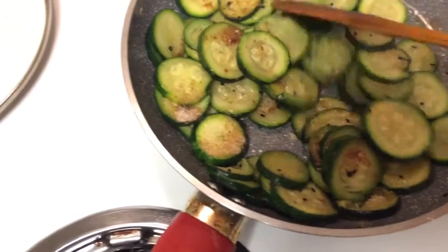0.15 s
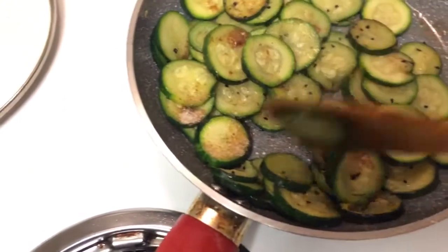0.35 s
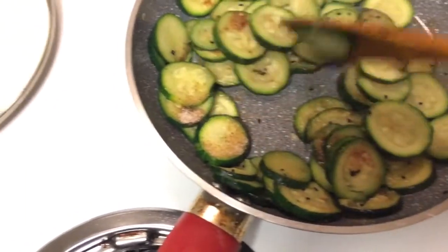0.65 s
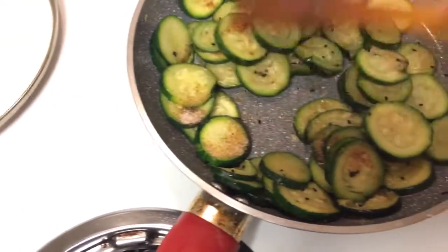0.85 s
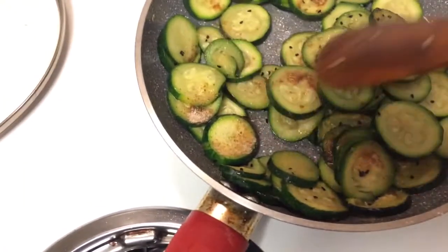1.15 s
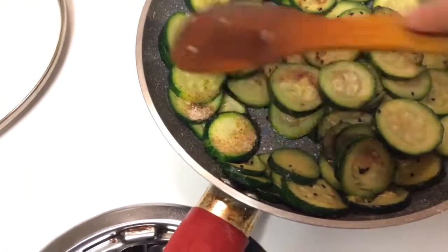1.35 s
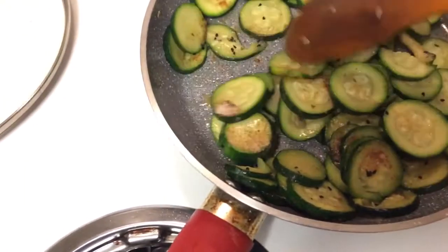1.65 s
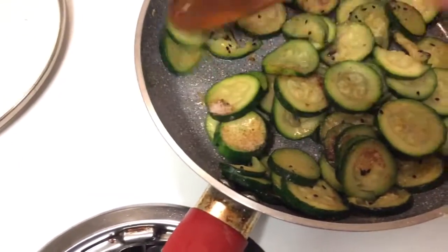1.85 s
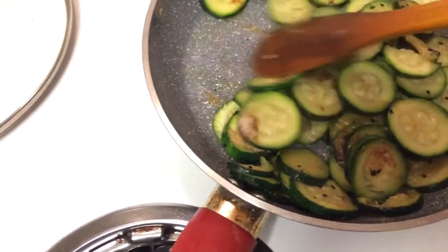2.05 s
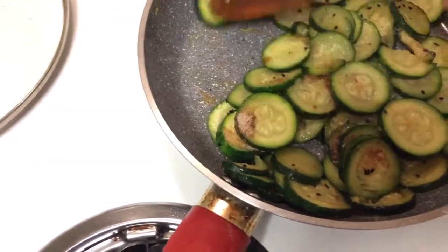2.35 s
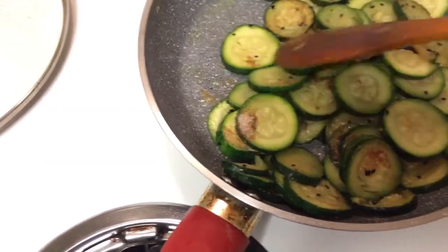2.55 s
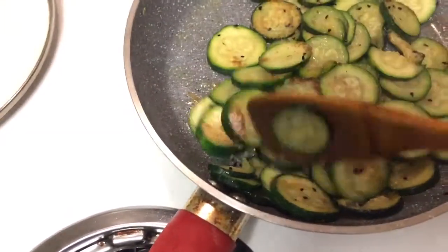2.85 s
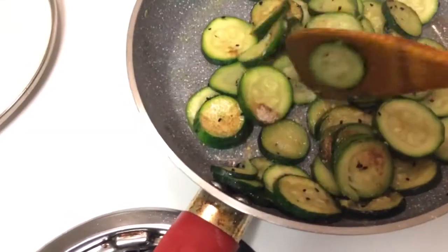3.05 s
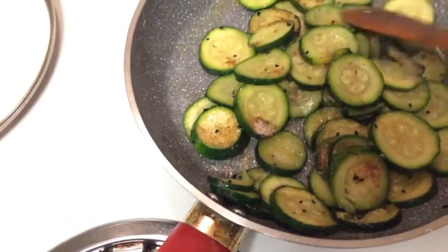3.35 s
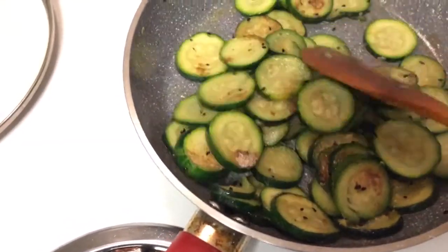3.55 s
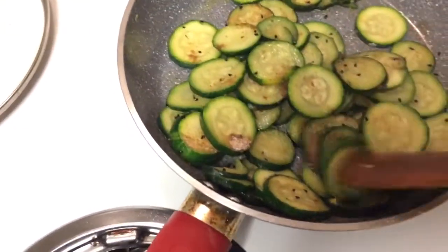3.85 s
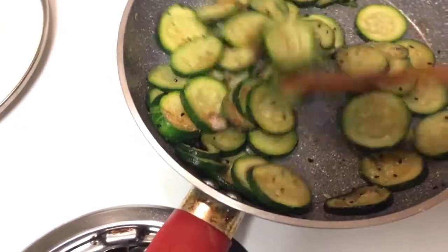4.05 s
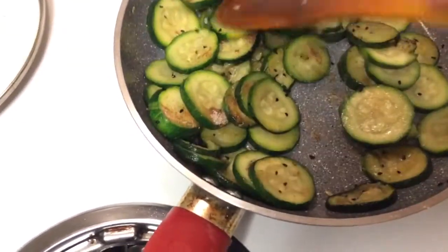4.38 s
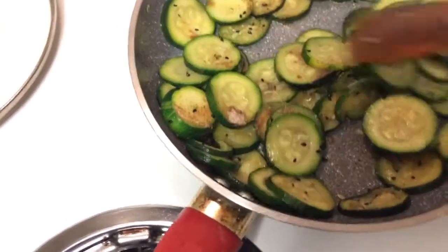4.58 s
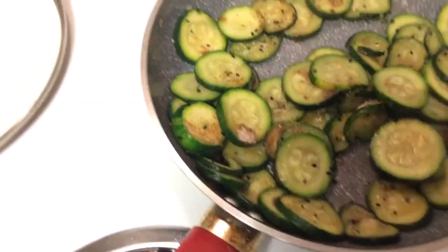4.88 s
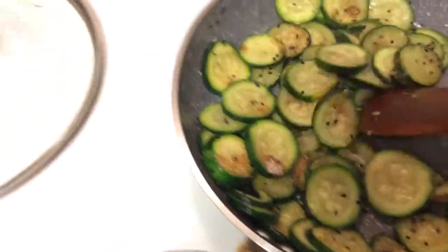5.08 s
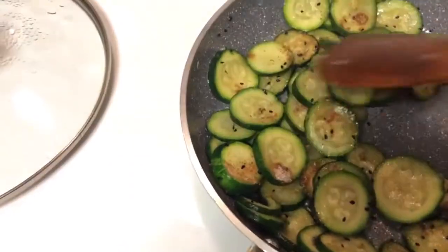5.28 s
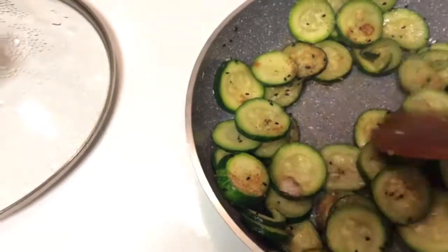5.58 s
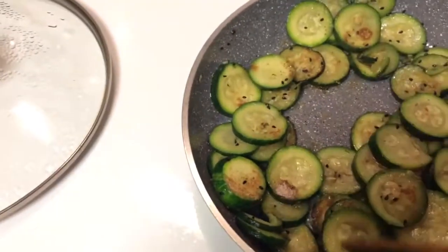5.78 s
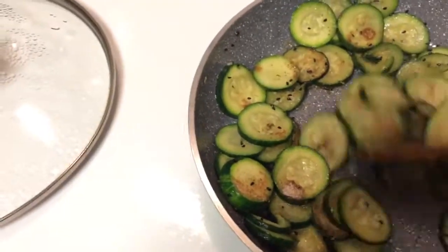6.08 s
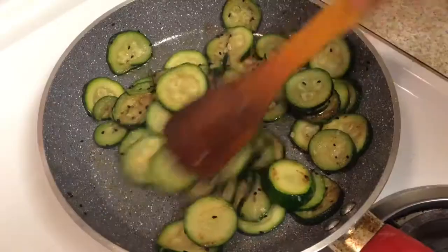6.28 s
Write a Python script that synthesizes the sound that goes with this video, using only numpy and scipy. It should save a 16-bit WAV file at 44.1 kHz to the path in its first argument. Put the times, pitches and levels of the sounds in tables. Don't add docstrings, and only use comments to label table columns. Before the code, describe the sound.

Steady wet frying hiss fills the close mono sound. Wood clatters quickly against the pan at first, then eases into sparse light taps, and later returns with harder knocks and rattling scrapes on floor, wall and rim. Low thuds come from the rocking pan, faint steam hisses and tiny pops from the food. A split-second silence precedes a last brighter sizzle and soft handle bumps in the kitchen.

```python
import sys
import numpy as np
from scipy import signal
from scipy.fft import rfft, irfft, next_fast_len
from scipy.io import wavfile
from scipy.ndimage import uniform_filter1d, map_coordinates

SR = 44100
rng = np.random.default_rng(int(sys.argv[2]) if len(sys.argv) > 2 else 0)


def boost(x):
    u = np.asarray(x, float) / 20
    return 10 ** u


def unload_wav(signal):
    wavfile.write(
        sys.argv[1],
        SR,
        np.round(np.clip(np.atleast_2d(signal).T, -1, 1) * 32767).astype(np.int16),
    )


N = 283122

# mode_hz, width_hz, level_db
BOWL_MODES = [(131, 16, -5), (273, 30, -11), (455, 17, 0), (600, 90, -17), (350, 60, -17)]
FLOOR_MODES = [(647, 55, -6), (839, 46.4, 2), (951, 57, -4), (1114, 270, -12)]
WALL_MODES = [(1288, 290, -3.5), (1474, 71, 7.5), (1666, 250, -1.5), (1900, 162, 1), (2104, 99, -1.5),
              (2334, 110, -2.5)]
EDGE_MODES = [(2695, 180, -1.5), (3364, 305, 3), (4090, 680, -2), (5170, 2000, -6.5), (7080, 3200, -7.5),
              (11800, 7800, -18.5)]


def unit(x):
    return x / np.sqrt(np.mean(x ** 2) + 1e-20)


def along(points, hz):
    f, v = np.transpose(points)
    return np.interp(np.log(hz + 1), np.log(f + 1), v)


def wobble(knots_per_s):
    knots = rng.standard_normal(int(N * knots_per_s / SR) + 4)
    return map_coordinates(knots, [np.arange(N) * knots_per_s / SR])


def filtered(x, response):
    m = next_fast_len(len(x) + 8192)
    return irfft(rfft(x, m) * response(np.fft.rfftfreq(m, 1 / SR)), m)[:len(x)]


def coloured(x, spectrum):
    return unit(filtered(x, lambda hz: boost(along(spectrum, hz))))


def swells(rows, rest_db, rise_db_s, fall_db_s):
    t = np.linspace(0, N / SR, num=3000)
    power = boost(2 * rest_db)
    for start_s, hold_s, db in rows:
        rise_db = rise_db_s * np.maximum(start_s - t, 0)
        fall_db = fall_db_s * np.maximum(t - start_s - hold_s, 0)
        power = power + boost(2 * (db - rise_db - fall_db))
    return np.interp(np.arange(N) / SR, t, 10 * np.log10(power))


def ringing(modes, scatter_db=0, detune=0, damping=1):
    chance = rng.standard_normal((len(modes), 2))
    hz, width_hz, db = np.transpose(modes)
    hz = hz * (1 + detune * chance[:, 0])
    width_hz = width_hz * damping
    gain = boost(db + scatter_db * chance[:, 1])

    def response(f):
        total = 0
        for k in range(len(modes)):
            loss = 1j * f * width_hz[k]
            total = total + (-1) ** k * gain[k] * loss / (hz[k] ** 2 - f * f + loss)
        return total
    return response


def crackle(clicks_per_s, spread_db, share, patchy_db):
    z = signal.stft(rng.standard_normal(N), nperseg=512)[2]
    field = uniform_filter1d(uniform_filter1d(rng.standard_normal(z.shape), 6, 0), 12, 1)
    bed = signal.istft(z * boost(patchy_db * unit(field)), nperseg=512)[1][:N]
    bursts = rng.random(N) < clicks_per_s / SR
    size_db = spread_db * np.minimum(rng.exponential(size=N), 4)
    clicks = bursts * boost(size_db) * rng.standard_normal(N)
    return np.sqrt(1 - share) * unit(bed) + np.sqrt(share) * unit(clicks)


def kitchen(x):
    # band_hz, t60_s
    decay = [(200, 0.25), (2000, 0.15), (10000, 0.084)]
    hz, t, z = signal.stft(rng.standard_normal(SR // 2), SR, nperseg=256)
    fade = boost(-60 * t / along(decay, hz)[:, None])
    tail = signal.istft(z * fade, SR, nperseg=256)[1]
    delayed = np.pad(x, (300, 0))
    return signal.fftconvolve(delayed, tail / np.linalg.norm(tail))[:N]


def appliance_hum():
    # band_hz, density_db
    spectrum = [(105, -42), (120, -8), (127, 2), (134, -7), (150, -39)]
    return boost(-66) * coloured(rng.standard_normal(N), spectrum)


def thumps():
    # start_s, peak_db, pitch_hz
    bumps = [
        (6.243, -35, 70.1),
        (6.257, -38, 66.2),
        (6.276, -36, 92),
        (6.286, -36, 74.6),
        (6.304, -38, 70),
    ]
    out, t = np.zeros(N + SR), np.arange(3000) / SR
    for s, db, hz in bumps:
        push = boost(db - 1.5 - 60 * t / 0.084) * np.sin(2 * np.pi * hz * t)
        out[round(s * SR):][:len(t)] += push
    return out[:N]


def pops():
    # start_s, peak_db, pitch_hz
    droplets = [(0.4663, -20, 5850), (1.453, -35, 3500), (1.9994, -22, 4750), (2.1155, -20, 5230),
                (2.8868, -39, 3700), (3.4496, -20, 6550), (3.5558, -28, 6500), (5.088, -15, 6700),
                (5.2001, -16, 6300), (6.2991, -28, 4920), (6.3147, -34, 4980), (6.3264, -25, 5500),
                (6.3324, -22, 4820), (6.3444, -29, 6740), (6.3805, -17, 8600)]
    out, t = np.zeros(N + SR), np.arange(200) / SR
    for s, db, hz in droplets:
        burst = boost(db + 0.5 - 60 * t / 0.002) * np.sin(2 * np.pi * hz * t)
        out[round(s * SR):][:len(t)] += burst
    return out[:N]


def frying():
    # band_hz, density_db
    fizz_spectrum = [(120, -54), (200, -18), (279, -19), (378, -9), (458, -16), (512, -13.5), (715, -11),
                     (774, -29), (953, -8), (1540, 0), (2080, -4.5), (3460, -1), (9000, -6.5), (11700, -16),
                     (19800, -120)]
    hiss_spectrum = [(4000, -9.5), (6500, 1), (7800, -9), (10000, 2.5), (11500, 1), (14600, 2),
                     (15300, -1.5)]
    jet_spectrum = [(4800, -22.5), (5800, -5.5), (6700, 0), (7450, -4.5), (7900, -18)]
    # start_s, hold_s, over_simmer_db
    flares = [(.13, .11, 3), (.5, 0.14, 1), (1.01, 0.12, 0), (1.56, 0.096, 3), (2.02, 0.16, 0),
              (2.88, 0.15, -2), (3.52, .13, -1), (3.99, 0.1, 4.5), (4.62, 0.043, 0), (5.08, 0.077, -9),
              (5.65, .1, -4.5), (6.04, 0.066, -0.5), (6.19, 0.07, -1), (6.32, 0.063, 7.5)]
    # start_s, hold_s, level_db
    jets = [
        (3.1, 0.039, -40),
        (3.2, 0.36, -44.5),
        (4.25, .4, -50.5),
        (6.34, .03, -44.5),
    ]
    boil_db = swells(flares, rest_db=0.5, rise_db_s=87, fall_db_s=110)
    jet_db = swells(jets, rest_db=-60, rise_db_s=130, fall_db_s=90)
    surge = wobble(25)
    fizz_db = -48.5 + boil_db + 5.0 + 0.34 * surge
    simmer_hiss_db = -42.5 + 0.48 * boil_db
    jet_share = 0.72
    hiss_db = 10 * np.log10(boost(2 * simmer_hiss_db) + jet_share * boost(2 * jet_db)) + 0.6 * surge
    fizz = boost(fizz_db) * coloured(crackle(1500, 2.3, 0.21, patchy_db=1.5), fizz_spectrum)
    hiss = boost(hiss_db) * coloured(crackle(2600, 2.6, 0.26, patchy_db=1.2), hiss_spectrum)
    jet = boost(jet_db + wobble(40)) * coloured(crackle(2300, 2.3, 0.078, patchy_db=1.5), jet_spectrum)
    return fizz + hiss + jet


def stirring():
    # start_s, hold_s, scrape_db, rock_db
    strokes = [(0, .04, -43, -38), (0.094, .03, -35.5, -38), (0.172, 0.017, -52, -35),
               (0.288, 0.027, -40, -36), (0.377, 0.11, -42.5, -41.5), (0.977, 0.016, -54, -40.5),
               (1.105, .01, -47, -46), (1.52, 0.026, -54, -44), (2.03, 0.014, -49, -42),
               (2.2, .02, -56, -59), (2.458, 0.034, -58, -40), (2.63, .02, -56, -41),
               (2.71, .02, -42, -40.5), (2.835, 0.16, -52, -49.5), (3.482, 0.017, -49.5, -47.5),
               (3.59, .015, -48, -66), (3.677, .04, -43, -37.5), (3.773, 0.075, -39.5, -39),
               (3.9, 0.085, -52, -40), (4.1, 0.069, -47, -48.5), (4.564, .015, -48.5, -44),
               (4.688, 0.016, -43, -30.5), (4.77, .04, -40, -45), (4.923, 0.079, -42, -38),
               (5.145, .02, -42.5, -39), (5.25, 0.13, -50.5, -47), (5.686, 0.0087, -70, -46),
               (5.83, .02, -49.5, -45), (5.995, .04, -49, -45), (6.253, 0.041, -50, -41.5)]
    # band_hz, density_db
    hob_spectrum = [(15, -47), (25, -34), (59, 2), (97, -6), (124, 3), (156, -8.5), (182, 1), (217, -13),
                    (270, -8.5), (300, -9.5), (390, -9), (660, -120)]
    scrapes = [(s, hold, db) for s, hold, db, _ in strokes]
    rocks = [(s, hold, db) for s, hold, _, db in strokes]
    scrape_db = swells(scrapes, rest_db=-53, rise_db_s=168, fall_db_s=153)
    rock_db = swells(rocks, rest_db=-58.5, rise_db_s=333, fall_db_s=110)
    drag = boost(1.9 * wobble(60)) * crackle(900, 2.4, 0.55, patchy_db=3.5)
    parts = [(BOWL_MODES, -1.5), (FLOOR_MODES, 0.8), (WALL_MODES, -1.5), (EDGE_MODES, -9)]
    pan = sum(boost(db) * filtered(drag, ringing(modes, damping=1.43)) for modes, db in parts)
    rock = coloured(boost(1.6 * wobble(30)) * rng.standard_normal(N), hob_spectrum)
    return boost(scrape_db + 0.5) * unit(pan) + boost(rock_db - 2.9) * rock


def contacts():
    # start_s, peak_db, weight_db, sharpness_db
    floor_taps = [(.142, -23, -24, -12), (.177, -22, -14, -17), (.381, -22, -29, -13),
                  (.538, -7.5, -32.5, -33), (.976, -21, -23.5, -11.5), (1.082, -23.5, -14.5, -18),
                  (1.657, -28, -33, -26), (2.029, -34, -11, -12), (2.065, -35, -10, -13),
                  (3.676, -18.5, -17, -27), (3.955, -22.5, -10, -22), (3.969, -26, -24, -11),
                  (4.139, -28.5, -36, -10), (4.712, -18, -4.5, -17), (4.814, -16.5, -11, -15.5),
                  (4.982, -26.5, -7, -4.5), (5.272, -35, -18, -14), (5.749, -18, -15.5, -26)]
    floor_skids = [(.047, -18, -19, -14), (.086, -17.5, -5.5, -15), (.228, -26, -19, -13),
                   (.283, -20, -4.5, -9.5), (.352, -16.5, -13.5, -11), (.445, -23.5, -17, -9),
                   (1.523, -26.5, -21, -20), (2.605, -19, -12.5, -15), (2.711, -24, -15.5, -13),
                   (3.707, -18, -3, -12.5), (3.827, -19, -8.5, -16), (3.891, -26.5, -11, -15),
                   (4.587, -28.5, -17, -18), (4.689, -16.5, -30, -27), (4.873, -15.5, -41, -11.5),
                   (4.991, -19, -33, -8.5), (5.114, -14.5, -17.5, -7.5), (5.8, -27, -29, -23)]
    wall_taps = [(.241, -9.5, -13.5, -10.5), (.264, -17.5, -12, -29), (.403, -22.5, -30, -17),
                 (.567, -28.5, -33, -8), (.883, -35.5, -39, -4), (1.981, -35, -13, -9),
                 (2.437, -32.5, -4.5, -37), (2.501, -41, 0, -8), (2.799, -30.5, -22, -18),
                 (2.886, -32, -15, -5.5), (3.479, -32, -6.5, -29), (3.792, -15.5, -18, -17.5),
                 (3.816, -22, -21, -19), (3.842, -19.5, -27, -14.5), (3.978, -20, -13, -19),
                 (3.988, -15.5, -24, -24), (4.826, -16, -13, -29), (4.935, -20.5, -19.5, -30),
                 (5.108, -21, -26, -41), (5.219, -27.5, -36, -21), (5.645, -16, -19.5, -16),
                 (5.699, -26, -17, -22), (5.899, -35.5, -13, -19), (6.03, -23, -19.5, -19)]
    rim_skids = [(.15, -11, -13, -8.5), (.164, -14.5, -12.5, -17), (3.659, -4.5, -19.5, -12),
                 (4.119, -27, -29, -8.5), (4.673, -5, -18, -14), (4.865, -22.5, -4.5, -17),
                 (6.11, -29, -20, -18)]
    tap_chatter_db, skid_chatter_db = -18.5, -12
    on_floor_db, on_wall_db, on_rim_db = -10.5, -16, -18
    kinds = [(floor_taps, on_floor_db, tap_chatter_db), (floor_skids, on_floor_db, skid_chatter_db),
             (wall_taps, on_wall_db, tap_chatter_db), (rim_skids, on_rim_db, skid_chatter_db)]
    blows = []
    for rows, floor_db, chatter_db in kinds:
        for s, db, weight_db, sharp_db in rows:
            blows.append((s, db, weight_db, floor_db, sharp_db, chatter_db))
    return sorted(blows)


def knocks():
    out, t = np.zeros(N + SR), np.arange(7000) / SR
    onset = t < 0.014
    push = 5.7 * (np.arange(len(t)) == 20)
    settle = 1 / (1 + (t / 0.026) ** 4)
    for s, db, bowl_db, floor_db, edge_db, chatter_db in contacts():
        noise, grain = rng.standard_normal((2, len(t)))
        crack = noise * boost(-60 * t / 0.0088) * (1 - np.exp(-t / 0.00032))
        rattle = boost(chatter_db - 60 * t / 0.064) * (1 - np.exp(-t / 0.0013))
        chatter = noise * grain ** 2 * rattle
        soft_hz = 3000 * boost(0.3 * (edge_db + 15))
        blow = push + 0.64 * crack + chatter
        dull = filtered(blow, lambda f: 1 / (1 - (f / soft_hz) ** 2 + 1.4j * f / soft_hz) ** 2)
        bright = crack + 1.27 * chatter
        parts = [(dull, BOWL_MODES, bowl_db - 3.5, 1), (dull, FLOOR_MODES, floor_db - 0.8, settle),
                 (dull, WALL_MODES, -13, settle), (bright, EDGE_MODES, edge_db - 5.0, 1)]
        for force, modes, part_db, mute in parts:
            ring = mute * filtered(force, ringing(modes, scatter_db=2.5, detune=0.008))
            out[round(s * SR):][:len(t)] += boost(db + part_db) * ring / np.std(ring[onset])
    return out[:N]


def scene():
    hits = knocks()
    room = boost(-13.5) * kitchen(hits)
    mono = hits + room + stirring() + thumps() + frying() + pops() + appliance_hum()
    return np.array([mono, mono])


def roll_off(x):
    return signal.sosfilt(signal.butter(12, 16460, fs=SR, output="sos"), x)


def record(dry):
    # start_s, end_s
    gap = (6.1295, 6.1765)
    t = np.arange(N) / SR
    gate = np.clip(np.maximum(gap[0] - t, t - gap[1]) / 0.00036, 0, 1)
    mono = gate * filtered(dry[0], lambda hz: hz < 15330)
    return roll_off(np.array([mono, mono]))


dry = scene()
out = record(dry)
unload_wav(out)
```